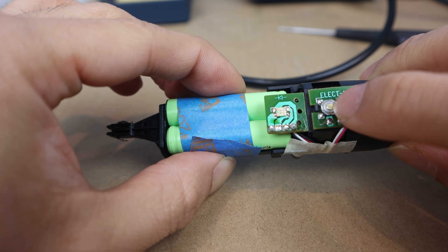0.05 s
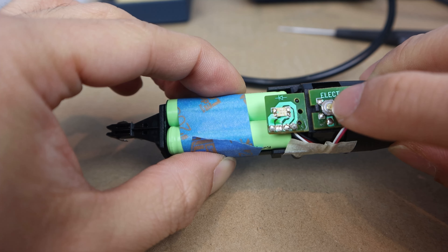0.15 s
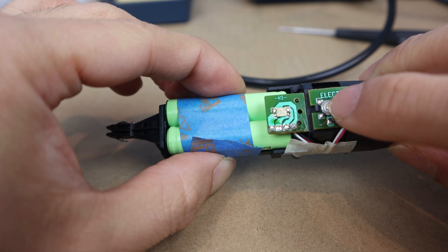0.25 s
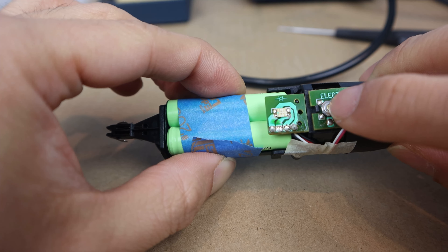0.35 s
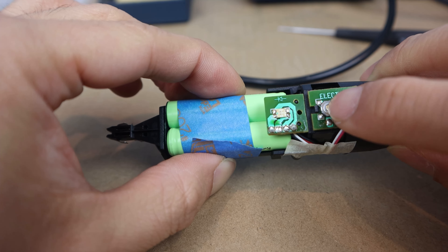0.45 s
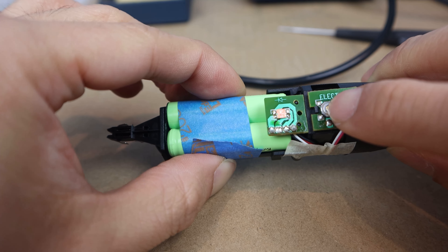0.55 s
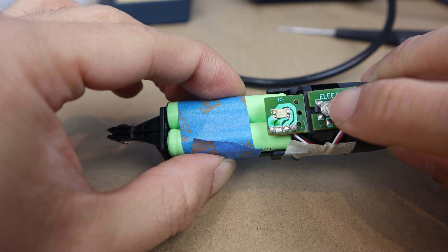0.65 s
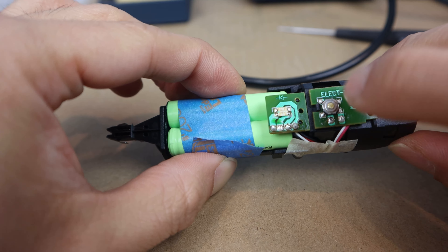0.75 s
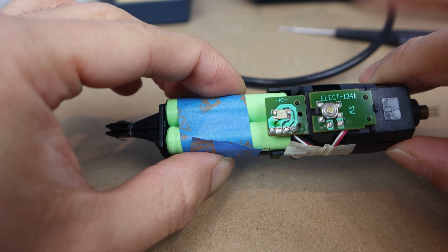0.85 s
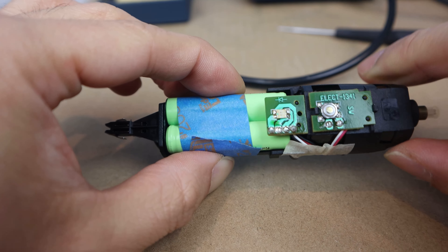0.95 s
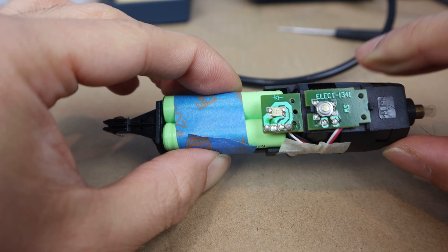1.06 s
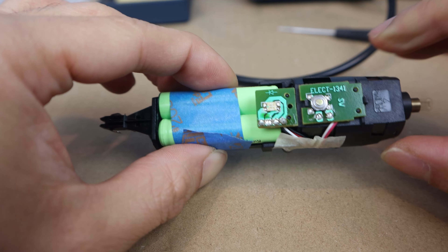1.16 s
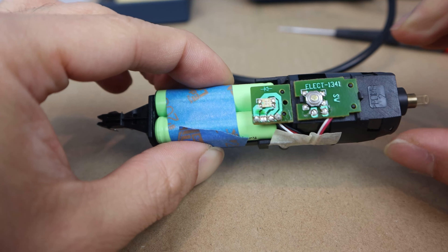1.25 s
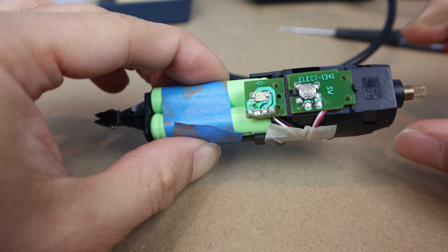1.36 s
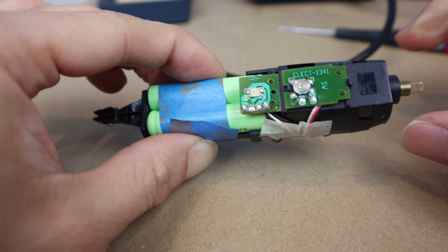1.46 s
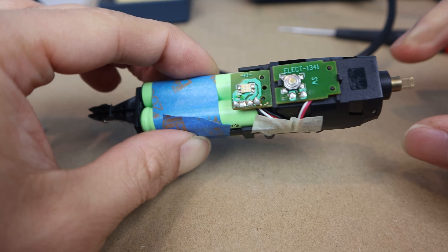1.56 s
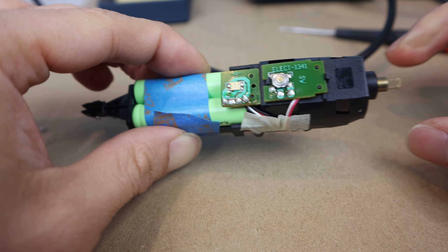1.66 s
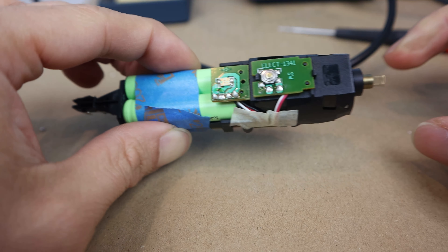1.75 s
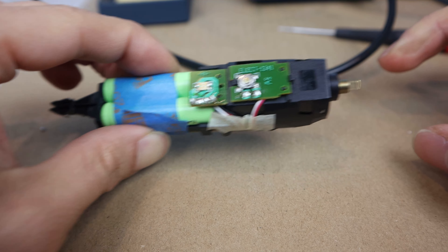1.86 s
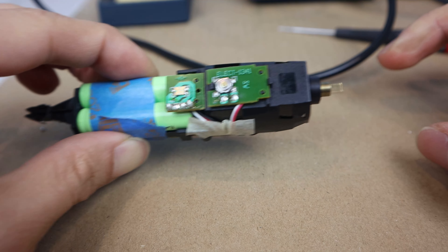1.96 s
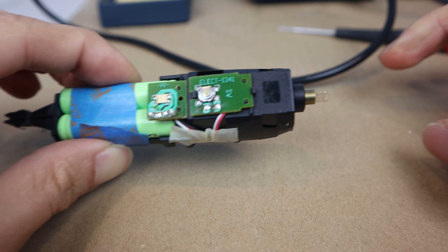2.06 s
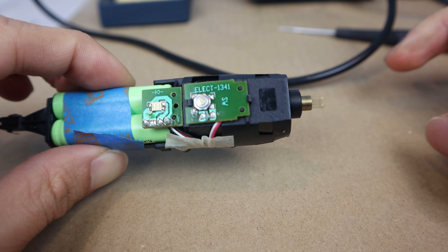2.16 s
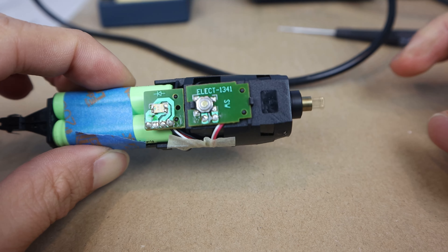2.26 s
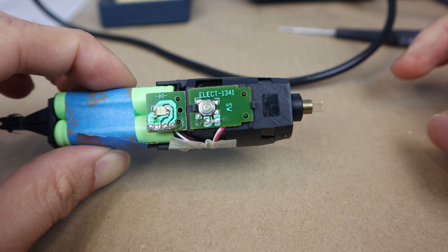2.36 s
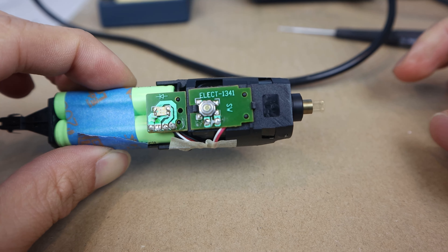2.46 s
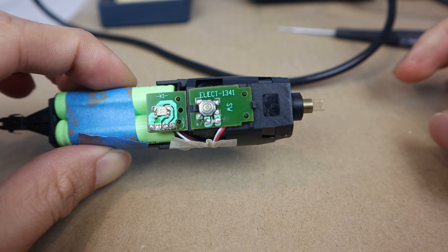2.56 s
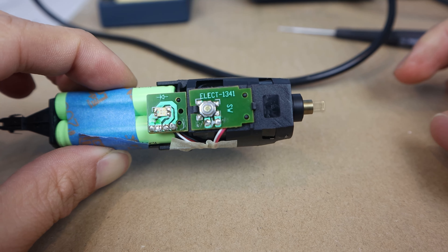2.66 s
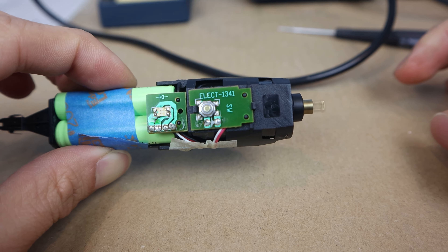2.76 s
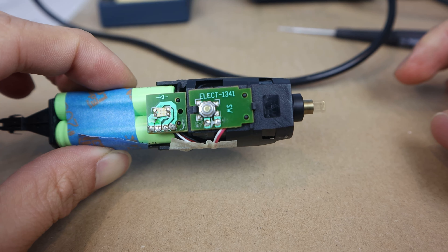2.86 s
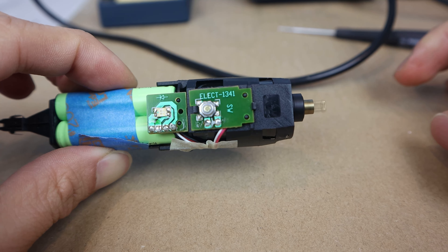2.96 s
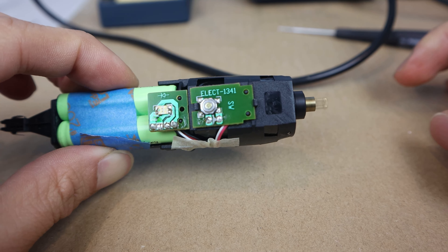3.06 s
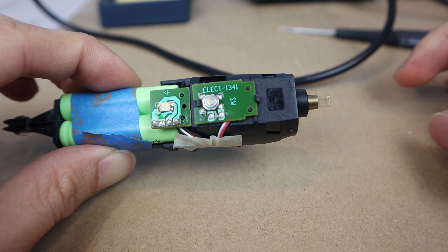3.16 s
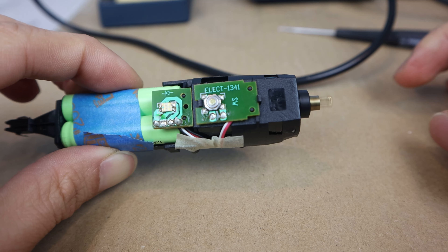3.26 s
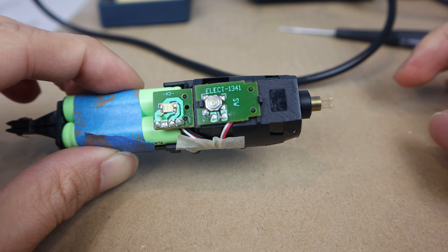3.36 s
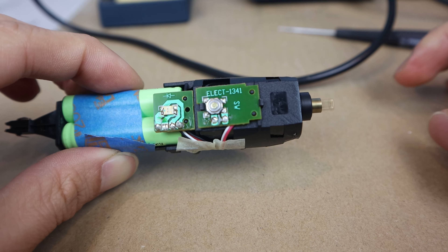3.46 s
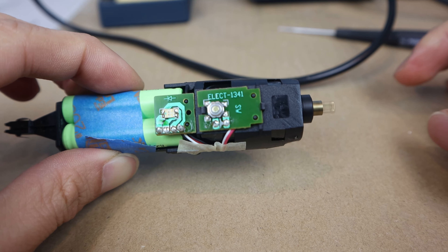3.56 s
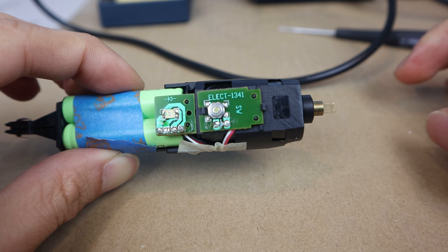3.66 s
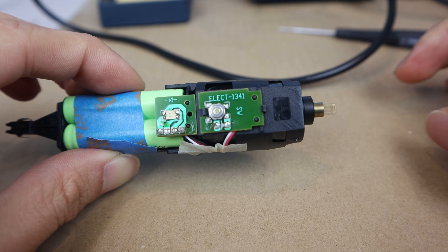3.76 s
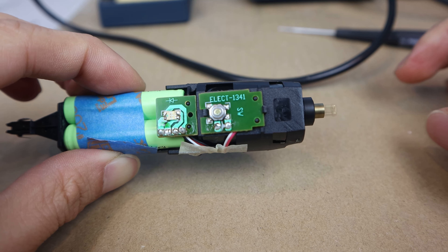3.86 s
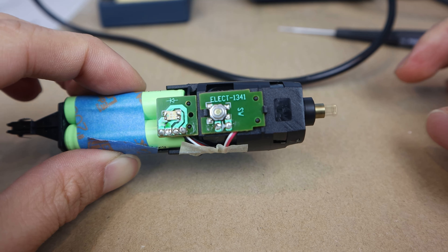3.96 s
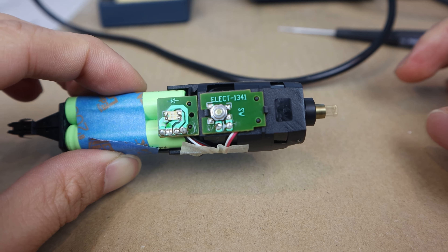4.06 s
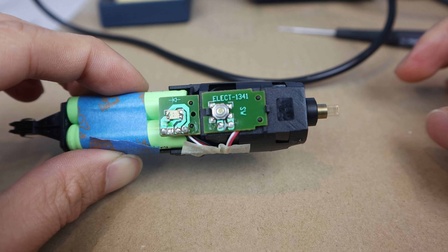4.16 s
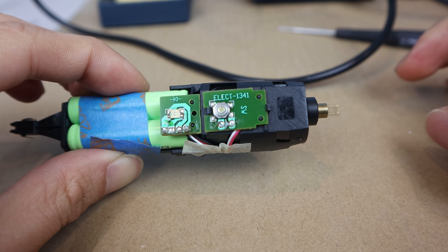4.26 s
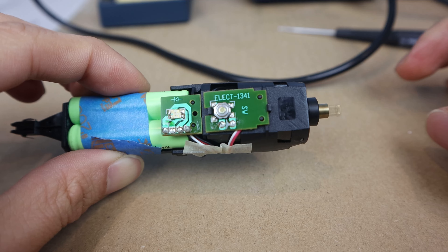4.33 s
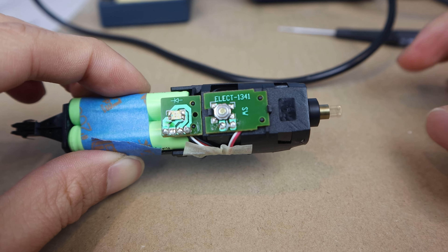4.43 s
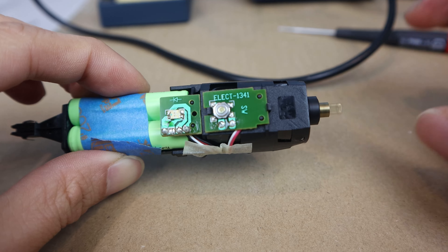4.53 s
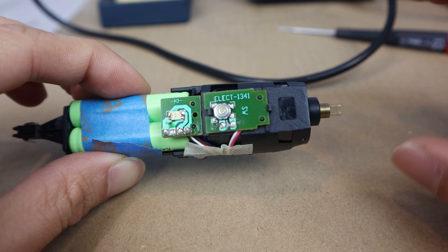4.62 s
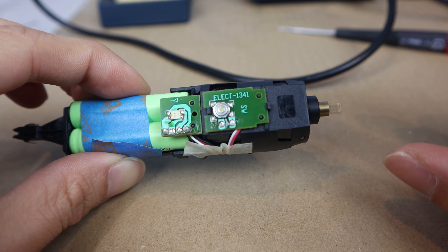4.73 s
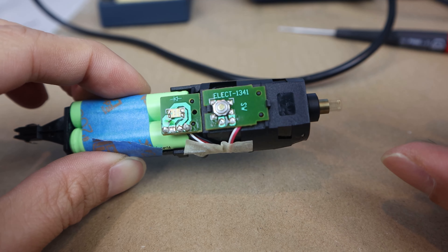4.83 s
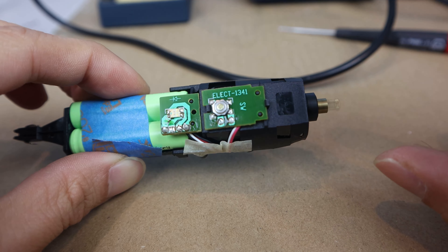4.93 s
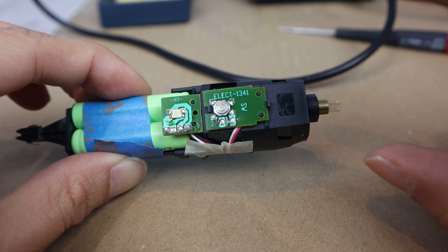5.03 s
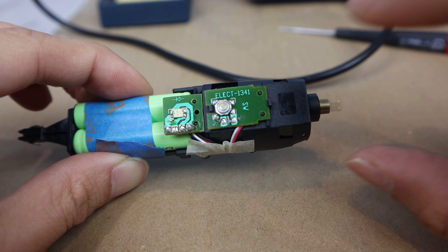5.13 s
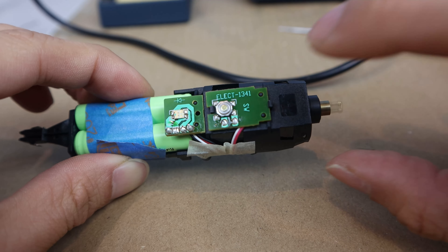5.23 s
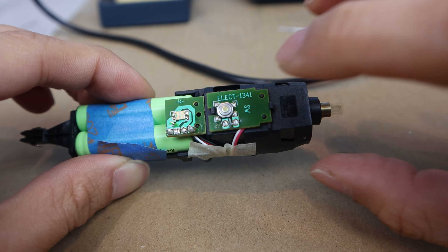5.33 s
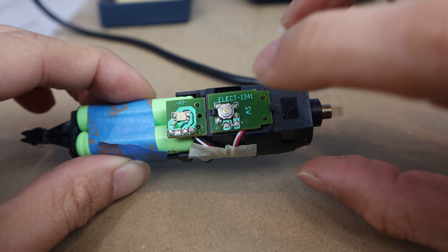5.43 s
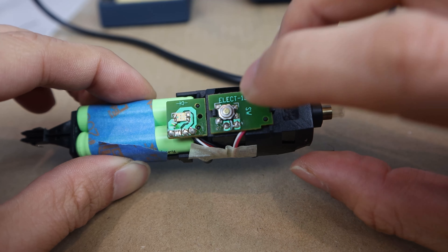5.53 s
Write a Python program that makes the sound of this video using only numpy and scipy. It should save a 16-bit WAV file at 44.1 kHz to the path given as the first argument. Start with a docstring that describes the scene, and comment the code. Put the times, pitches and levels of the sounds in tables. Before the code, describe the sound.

Close stereo microphone in a quiet indoor room with faint hum. Small finger ticks on a circuit board, then a button click starts a tiny bare motor. Its buzzy whine jumps up to a steady pitch, opens from muffled to bright as the hand lifts, and continues to the end with soft rubs and one wooden desk knock around two seconds.

```python
"""A steady whine springs up from a quiet, humming room, among finger ticks and rubs and one knock on a desk.
The whine is a small three-slot motor held bare in the hand: one turn of sound, built from tones at
multiples of the shaft speed, repeats faster as the motor spins up and changes as the hand opens.
Brush hiss, skin rubs and room air are shaped noise; ticks, knock and thuds are dying tones and noise puffs."""
import sys
import numpy as np
from scipy import signal
from scipy.fft import irfft
from scipy.io import wavfile
from scipy.ndimage import uniform_filter1d, map_coordinates

SR = 44100
rng = np.random.default_rng(int(sys.argv[2]) if len(sys.argv) > 2 else 0)


def log_audio(samples):
    """Write samples as a 16-bit WAV file to the path given in sys.argv[1]."""
    # one column per channel
    frames = np.atleast_2d(samples).T
    # limit to full scale, then quantise
    limited = np.clip(frames, -1, 1)
    pcm = np.round(limited * 32767).astype(np.int16)
    wavfile.write(sys.argv[1], SR, pcm)


N = 246463  # length in samples

# Room air. Each row: frequency in Hz, relative level in dB per Hz.
ROOM_COLOUR = [(12, -32), (20, -1.5), (66, -1.5), (91, -9), (242, -8), (309, -10.5), (451, -12), (592, -15),
               (8660, -32), (13000, -52)]
ROOM_DB = -52
# How alike the room air is left and right. Each row: frequency in Hz, likeness from -1 to 1.
ROOM_LIKENESS = [(60, 1), (380, 0.27), (2380, -0.19), (15000, -1.02)]
# Mains hum. Each row: frequency in Hz, level in dB before it wavers.
MAINS_HUM = [(60, -60.5), (120, -69.5), (240, -66)]

# Finger ticks on the button and board. Each row: start in seconds, level in dB, pitch in Hz.
FINGER_TICKS = [(0.156, -49, 1630), (0.2523, -47.5, 2540), (0.3681, -52, 2030), (0.504, -48, 1990),
                (0.6506, -35, 1480), (0.6564, -36, 1320), (0.8113, -27, 1340)]
# Skin sliding on the housing. Each row: start in seconds, time to the peak in seconds, level in dB.
SKIN_RUBS = [(0.647, 0.028, -39), (.802, .013, -36.5), (0.978, 0.027, -40), (1.05, 0.043, -45.5),
             (1.1, 0.45, -54), (1.801, 0.19, -42.5), (2.1, .2, -51.5), (4.85, .15, -54), (5.05, 0.27, -44),
             (5.4, .2, -51.5)]
# Colour of the rubbing skin. Each row: frequency in Hz, relative level in dB per Hz.
SKIN_COLOUR = [(150, -4), (300, -11), (2000, -4.5), (4000, -5), (7000, -21.5), (11000, -53)]

# How the hand holds the motor. Each row: time in seconds, grip (0 cupped, 1 lifted, 2 open),
# left over right in dB.
HAND_HOLD = [(.75, 0.041, -2), (.95, 0.35, -2.5), (1.3, .8, -3), (1.5, 1.32, -2), (1.85, 1.38, -0.8),
             (2.05, 1.45, 0.5), (2.4, 1.63, 0.5), (4.0, 1.71, 0), (4.9, 1.71, 0), (5.59, 1.9, -0.3)]
# Treble shading by the palm, in dB per octave: cupped, lifted, open.
PALM_SHADE_DB = (-5.5, 1.9, -0.5)
# The other hand comes over the motor and shades it more.
REACH_S, REACH_DB_PER_S = 4.7, -1
ON_S, TOP_HZ, SAG_HZ_PER_S = 0.65, 117.62, 0.025  # switch-on, shaft turns per second, slow sag
# Spin-up: speed missing at switch-on, time and shape of the catch-up, then a small slow settling.
LAG_HZ, SPIN_S, SPIN_SHAPE, SETTLE_HZ, SETTLE_S = 53.85, 0.045, 1.35, 1.1, 0.3
SLOW_DB = -42  # tone loss per octave of missing speed, one octave or more from the middle
STEP = 512  # samples between two shapes of the turn

# Brush clicks in one turn. Each row: place in turns, then level in dB near 1, 1.8, 2.7, 5 and 11 kHz.
SLOT_CLICKS = [(0, -2, -3, 1, -1.5, 0.5), (0.319, -0.47, 1, -4.5, 0.5, -12),
               (0.659, -1.2, -7.5, -23, -3, -11)]
# Housing colour of the clicks. Each row: frequency in Hz, dB when cupped, dB when lifted.
HOUSING_COLOUR = [(497, -54, -68), (713, -53, -55.5), (813, -41, -44), (1040, -53.5, -55),
                  (1280, -48.5, -51), (1620, -47, -52.5), (1920, -55, -66), (2460, -55.5, -51.5),
                  (3050, -61, -52), (3430, -63, -49.5), (4100, -57, -54), (4370, -67, -56),
                  (5180, -64, -52), (5450, -57, -49)]
# Housing tones in the open hand, before shading. Each row: multiple of the shaft speed, level in dB.
OPEN_TONES = [(6, -43.5), (7, -43.5), (8, -57.5), (9, -47), (10, -63.5), (11, -45.5), (12, -47.5),
              (13, -53), (14, -43), (15, -56), (16, -62), (17, -57.5), (18, -48.5), (19, -45), (20, -44.5),
              (21, -51.5), (22, -46), (23, -51), (24, -63), (25, -48.5), (26, -50), (27, -61), (28, -45.5),
              (29, -65), (30, -65), (31, -50.5), (32, -67.5), (33, -48), (34, -60), (35, -59.5), (36, -87),
              (37, -55), (38, -55), (39, -68), (40, -49), (41, -54), (42, -50.5), (43, -67), (44, -50),
              (45, -47), (46, -69)]
# Low tones, hardly radiated. Each row: multiple of the shaft speed, level in dB.
WEAK_LOW_TONES = [(2, -76), (3, -59.5), (4, -68.5), (5, -77.5)]
# The once-a-turn tone of the unbalanced shaft. Each row: time in seconds, level in dB.
SHAFT_UNBALANCE = [(.65, -62), (2.5, -60.5), (4.9, -63.5), (5.15, -64), (5.59, -47.5)]
# Upper tones. Each row: frequency in Hz, relative level in dB.
UPPER_TONES = [(3180, -30), (5400, 2), (5990, -6), (6510, 0), (6760, -12), (7440, -1), (8510, -27.5),
               (10700, -7.5), (11900, -8.5), (12900, -20), (14500, -21), (15200, -60)]
UPPER_TONES_DB = -63
# Balance of the tones, before a random spread. Each row: frequency in Hz, left over right in dB.
TONE_LEAN = [(700, -0.7), (1500, -1), (2500, -1), (3500, 0), (6000, -3), (12000, 1)]
# Stereo width of the tones. Each row: frequency in Hz, side over mid in dB before a further cut.
TONE_WIDTH = [(60, -42), (240, -9), (950, -18.5), (3770, -3), (15000, 4.5)]
# Random phase spread of the tones, which softens the clicks. Each row: frequency in Hz, spread in radians.
PHASE_SPREAD = [(700, 1), (1800, 1), (2300, 0.34), (4000, 0.95), (9000, 0.63)]
# How late the housing answers the click. Each row: frequency in Hz, delay in seconds.
HOUSING_DELAY = [(700, 0.00092), (1500, 0.00052), (2200, 0.00011), (3500, .00005), (5200, 0.00037),
                 (9000, .0001)]
# Brush hiss. Each row: frequency in Hz, relative level in dB per Hz.
BRUSH_COLOUR = [(400, -28), (700, -10), (1500, -1.5), (5000, 2), (6500, -4), (8000, -5.5), (9000, -16),
                (11000, -8), (13000, -13), (15000, -38)]
BRUSH_DB = -48.5  # before the palm shades it

# Soft thuds. Each row: start in seconds, level in dB, pitch in Hz.
SOFT_THUDS = [(1.949, -39, 204), (2.42, -49, 70.4), (2.521, -40, 98), (4.9, -40, 100), (4.909, -40, 202)]
# The knock and its two bounces. Each row: start in seconds, level in dB.
DESK_KNOCKS = [(2.1354, -17), (2.157, -31), (2.184, -31)]
# Ringing of the desk top. Each row: frequency in Hz, relative level in dB, time to fall 60 dB in seconds.
DESK_MODES = [(176, -23, 0.18), (351, -12, 0.11), (510, 2, 0.036), (670, -7, 0.017), (787, -0.5, 0.059),
              (990, -3, 0.032), (1480, -10, 0.03), (2090, -1, 0.018), (2840, -10, 0.015)]


def amp(db):
    """Turn decibels into an amplitude factor."""
    return 10 ** (np.asarray(db) / 20)


def evened(x):
    """Scale to an average (RMS) size of one."""
    return x / np.sqrt(np.mean(x ** 2) + 1e-20)


def read(points, hz):
    """Read a frequency table between its rows, on a log frequency scale."""
    f, value = np.transpose(points)
    return np.interp(np.log(hz + 1), np.log(f + 1), value)


def curve(rows, x):
    """Read every further column of a table in straight lines along its first column."""
    first, *columns = np.transpose(rows)
    return [np.interp(x, first, column) for column in columns]


def add(mix, start_s, sound):
    """Lay a sound into the mix at a start time."""
    part = mix[round(start_s * SR):][:len(sound)]
    part += sound[:len(part)]


def hiss(colour, likeness, patchy_db, size=512):
    """Two channels of noise with a spectrum, a left-right likeness and drifting patches."""
    hz = np.fft.rfftfreq(size, 1 / SR)
    frames = 4 * N // size + 5
    a, b, c, d, patches = rng.standard_normal((frames, len(hz), 5)).T
    patches = uniform_filter1d(patches, size=8, axis=0)  # smooth over frequency
    patches = evened(uniform_filter1d(patches, size=12, axis=1))  # and over time
    same = np.clip(read(likeness, hz), -1, 1)[:, None]
    left = a + 1j * b
    right = same * left + np.sqrt(1 - same ** 2) * (c + 1j * d)
    spectrum = np.array([left, right]) * amp(read(colour, hz)[:, None] + patchy_db * patches)
    _, noise = signal.istft(spectrum, nperseg=size, noverlap=3 * size // 4)
    return evened(noise[:, :N])


def ring(hz, t60, rise):
    """One dying tone with a soft start; it falls 60 dB in t60 seconds."""
    t = np.arange(SR // 4) / SR
    return np.sin(2 * np.pi * hz * t) * amp(-60 * t / t60) * (1 - np.exp(-t / rise))


def burst(lo_hz, hi_hz, t60):
    """A dying puff of noise in one band."""
    t = np.arange(SR // 4) / SR
    band = signal.butter(2, [lo_hz, hi_hz], "band", fs=SR, output="sos")
    noise = signal.sosfilt(band, rng.standard_normal(len(t)))
    return evened(noise) * amp(-60 * t / t60)


def room():
    """Ventilation rumble and microphone hiss are shaped noise; the mains hum is wavering sine tones."""
    t = np.arange(N) / SR
    hum = np.zeros(N)
    for hz, db in MAINS_HUM:
        waver_db = 1.1 * evened(uniform_filter1d(rng.standard_normal(N), size=8000))
        hum += amp(db + waver_db) * np.sin(2 * np.pi * hz * t)
    air = hiss(ROOM_COLOUR, ROOM_LIKENESS, 0.31, size=2048)
    return amp(ROOM_DB) * air + hum


def fingers():
    """Skin rubs in a grainy rustle; nails and the button tick on the board."""
    grain_db = 1.4 * evened(uniform_filter1d(rng.standard_normal(N), size=200))
    rub = evened(hiss(SKIN_COLOUR, [(300, 1.0), (5000, 0.22)], 1.0) * amp(grain_db))
    strokes = np.zeros(N)
    for start_s, rise_s, db in SKIN_RUBS:
        u = np.arange(0, 6, 1 / (rise_s * SR))  # time in units of the rise; the peak is at 1
        add(strokes, start_s, amp(db) * (u * np.exp(1 - u)) ** 1.42)
    ticks = np.zeros(N)
    for start_s, db, hz in FINGER_TICKS:
        snap = 0.32 * burst(1200, 6000, 0.0073)
        tail = 0.31 * burst(900, 3200, 0.11)
        tone = 0.72 * ring(hz, 0.018, 0.0002)
        add(ticks, start_s, amp(db) * (snap + tail - tone))
    return rub * strokes + ticks


def speed(t):
    """Shaft turns per second: it catches up quickly, settles, then sags a little."""
    on = np.maximum(t - ON_S, 0)
    lag = LAG_HZ * np.exp(-(on / SPIN_S) ** SPIN_SHAPE)
    settling = SETTLE_HZ * np.exp(-on / SETTLE_S)
    return TOP_HZ - lag - settling - SAG_HZ_PER_S * on


def shade(t):
    """Treble shading by both hands, dB per octave."""
    palm = np.interp(curve(HAND_HOLD, t)[0], range(3), PALM_SHADE_DB)
    return palm + REACH_DB_PER_S * np.maximum(t - REACH_S, 0)


def clicks(k, hz):
    """Spectrum of one turn's brush clicks; each slot has its own colour, and its place sets the phase."""
    bands_hz = [1000, 1800, 2700, 5000, 11000]
    return sum(amp(np.interp(hz, bands_hz, db)) * np.exp(-2j * np.pi * k * place)
               for place, *db in SLOT_CLICKS)


def tone_levels(t, k, hz, uneven_db):
    """Level of each shaft multiple over time in dB, set by housing, grip, shading and speed."""
    grip = curve(HAND_HOLD, t)[0]
    tone_db = np.tile(UPPER_TONES_DB + read(UPPER_TONES, hz) + uneven_db, (len(t), 1))
    cupped, lifted = curve(HOUSING_COLOUR, speed(t)[:, None] * k)
    cupped, lifted = cupped + 0.8 * uneven_db, lifted + 0.6 * uneven_db
    for order, opened in OPEN_TONES:
        i = round(order) - 1
        closed_hand = cupped[:, i] + grip * (lifted - cupped)[:, i]
        opening_hand = lifted[:, i] + (grip - 1) * (opened - lifted[:, i])
        tone_db[:, i] = np.where(grip < 1, closed_hand, opening_hand)
    for order, db in WEAK_LOW_TONES:
        tone_db[:, round(order) - 1] = db
    tone_db[:, 0] = curve(SHAFT_UNBALANCE, t)[0]
    tone_db += shade(t)[:, None] * np.clip(np.log2(hz / 3400.0), 0, 2)
    missing_octaves = np.log2(TOP_HZ / speed(t))[:, None]
    tone_db += SLOW_DB * missing_octaves * np.minimum(abs(np.log2(hz / 1670.0)), 1)
    return tone_db


def whine(turns):
    """The sound repeats every turn: one turn is built from shaft multiples and changes with the grip."""
    t = np.arange(N // STEP + 2) * STEP / SR
    pan_db = curve(HAND_HOLD, t)[1]
    k = np.arange(1, 130)  # multiples of the shaft speed
    hz = k * TOP_HZ
    turn = clicks(k, hz)  # gives the tones their timing and their unevenness
    uneven_db = 20 * np.log10(abs(turn) + 0.11)
    tone_db = tone_levels(t, k, hz, uneven_db)
    lean_db = read(TONE_LEAN, hz) + 0.77 * rng.standard_normal(len(k))
    lean_db[0] = 0
    for order, _ in WEAK_LOW_TONES:
        lean_db[round(order) - 1] = 0
    # Each tone wavers, the high ones most, and gets a random phase offset.
    drift = evened(uniform_filter1d(rng.standard_normal((2, len(t), len(k))), size=12, axis=1))
    drift = drift * (hz / 3850.0) ** 0.56
    late = 2 * np.pi * TOP_HZ * np.cumsum(read(HOUSING_DELAY, hz))
    offset = read(PHASE_SPREAD, hz) * rng.standard_normal(len(k))
    phase = np.angle(turn) + offset - late + 0.18 * drift[1]
    mid = np.sqrt(2) * amp(tone_db + drift[0]) * np.exp(1j * phase)
    # The real part of the side leans left or right, the imaginary part widens.
    ratio = amp(lean_db + pan_db[:, None])
    width = rng.choice([-1, 1], len(k)) * amp(read(TONE_WIDTH, hz) - 3.0)
    side = (ratio - 1) / (ratio + 1) + 1j * width
    size = 4096  # points in one turn
    where = [np.arange(N) / STEP, turns % 1 * size]
    channels = []
    for way in (1, -1):
        spectrum = np.pad(mid * (1 + way * side), ((0, 0), (1, 0)))
        shapes = irfft(spectrum, size) * size / 2
        shapes = np.c_[shapes, shapes[:, :1]]  # close the turn on itself
        channels.append(map_coordinates(shapes, where, order=1))
    return np.array(channels)


def brushes(turns):
    """Hiss of the brushes, flaring at each slot, shaded by the palm."""
    flare = sum(np.exp(-((turns - place) % 1) / 0.19) for place, *_ in SLOT_CLICKS)
    noise = hiss(BRUSH_COLOUR, [(500, 0.8), (9000, 0.09)], 3.8)
    noise = evened(noise * (0.62 + flare))
    return amp(BRUSH_DB + 0.1 * shade(np.arange(N) / SR)) * noise


def motor():
    """Whine and brush hiss follow the shaft's turns and fade in quickly when the button closes."""
    t = np.arange(N) / SR
    turns = np.cumsum(speed(t)) / SR
    return (whine(turns) + brushes(turns)) * np.clip((t - ON_S) / 0.021, 0, 1)


def desk():
    """A knock rings the desk top and comes back from the walls; soft thuds come through the desk."""
    thuds, knock = np.zeros(N), np.zeros(N)
    for start_s, db, hz in SOFT_THUDS:
        add(thuds, start_s, amp(db) * ring(hz, 0.16, 0.0035))
    for start_s, db in DESK_KNOCKS:
        ringing = sum(amp(mode_db) * ring(hz, t60, 0.00063) for hz, mode_db, t60 in DESK_MODES)
        add(knock, start_s, amp(db) * (ringing + 0.43 * burst(173, 1130, 0.12)))
    # Walls: dying noise that begins 8 ms after the knock.
    t = np.arange(SR // 2) / SR
    walls = rng.standard_normal((2, len(t))) * amp(-60 * t / 0.5) * (t > 0.008)
    walls /= np.linalg.norm(walls[0])
    echo = signal.fftconvolve(knock[None], walls, axes=1)[:, :N]
    direct = knock * amp([[2.0], [-1.0]])  # left, right
    return direct + amp(-7.0) * echo + thuds


def scene():
    """Room, fingers, motor and desk together."""
    return room() + fingers() + motor() + desk()


def record(dry):
    """Soften the very top: a low-pass filter near 15.3 kHz."""
    lowpass = signal.firwin(511, 15300, window=("kaiser", 9), fs=SR)
    return signal.oaconvolve(dry, lowpass[None], "same")


dry = scene()
out = record(dry)
log_audio(out)
```